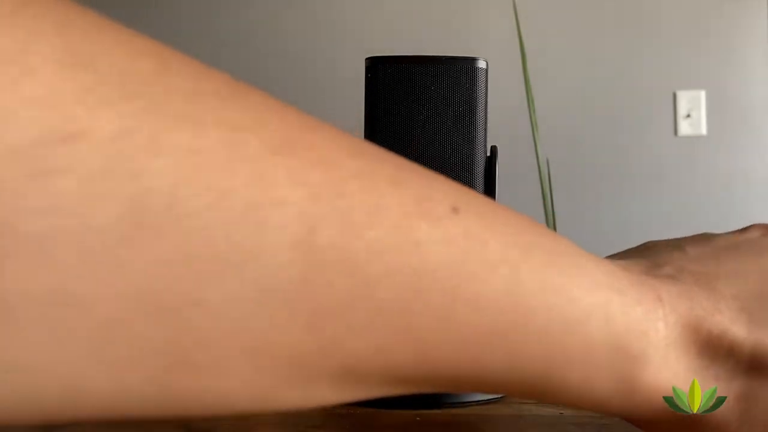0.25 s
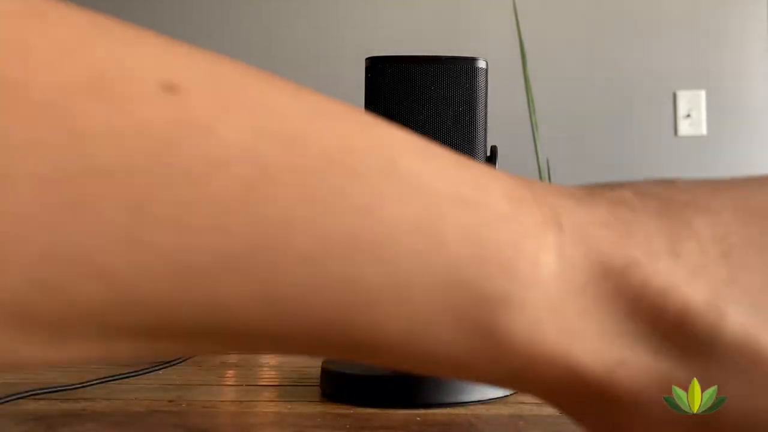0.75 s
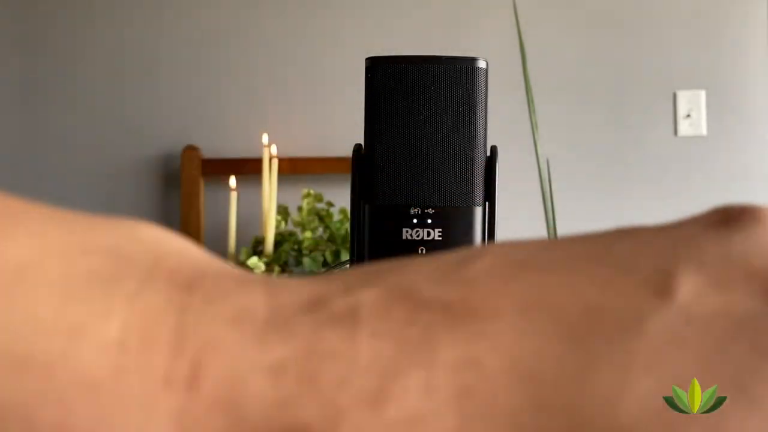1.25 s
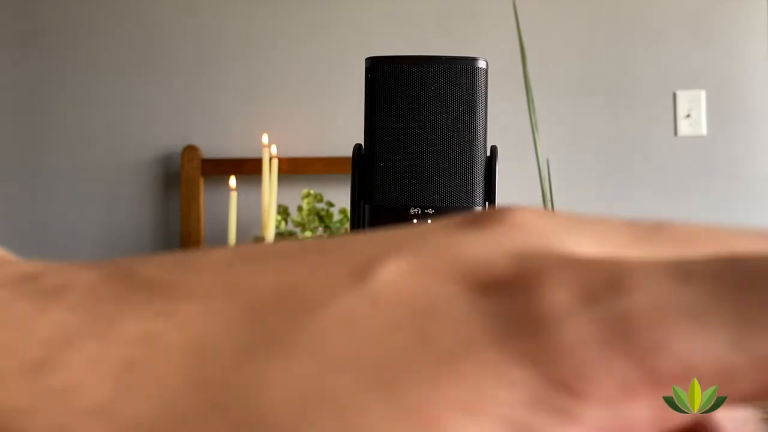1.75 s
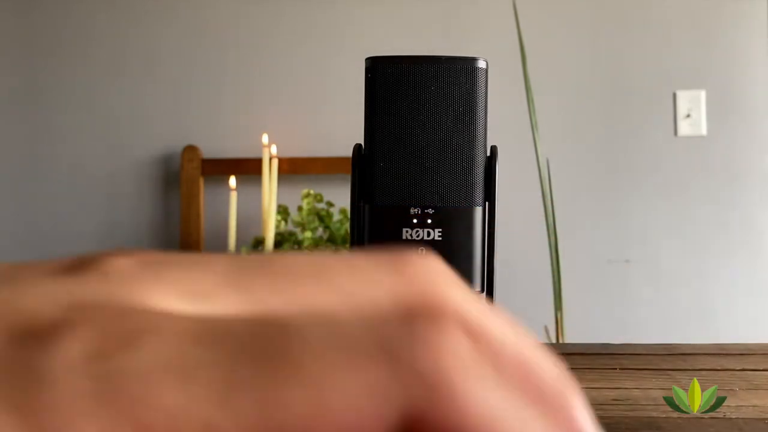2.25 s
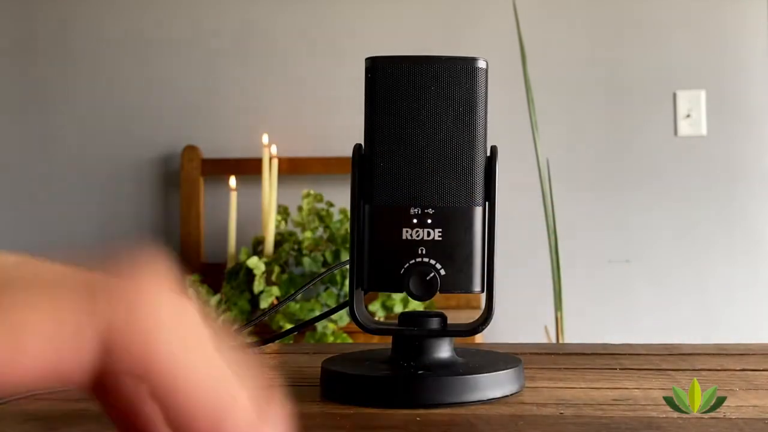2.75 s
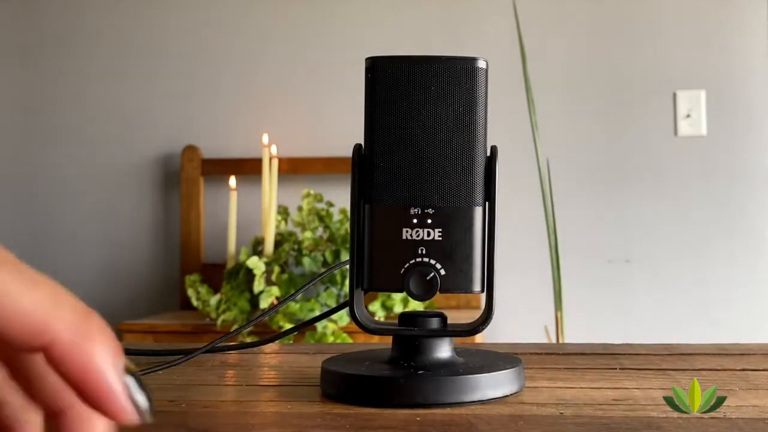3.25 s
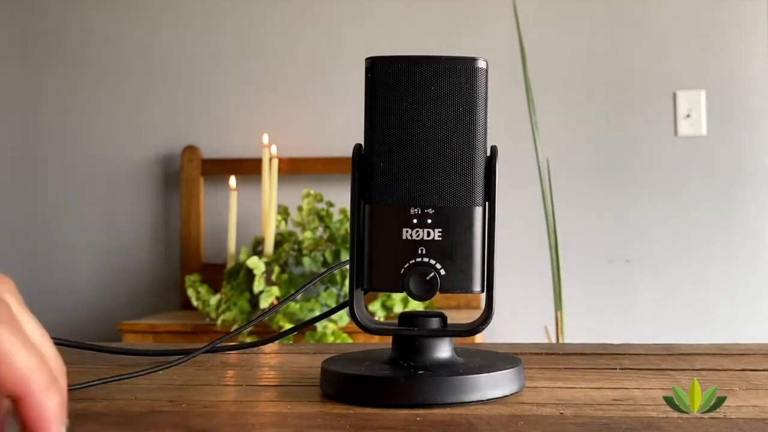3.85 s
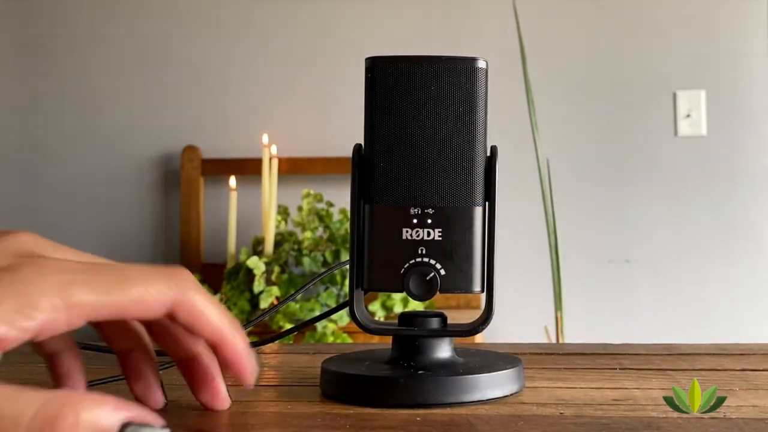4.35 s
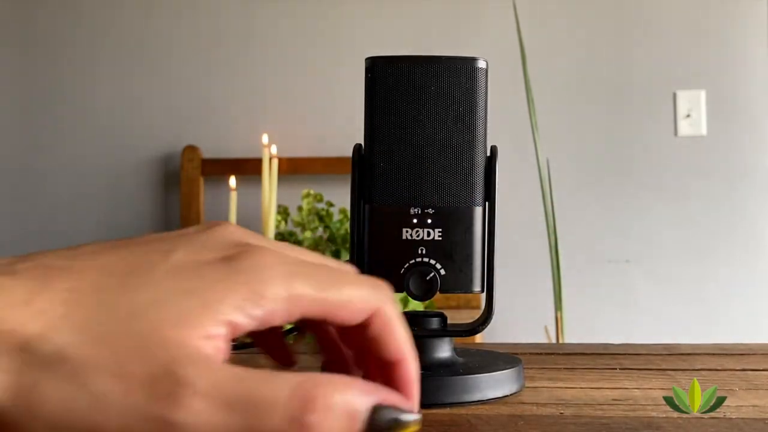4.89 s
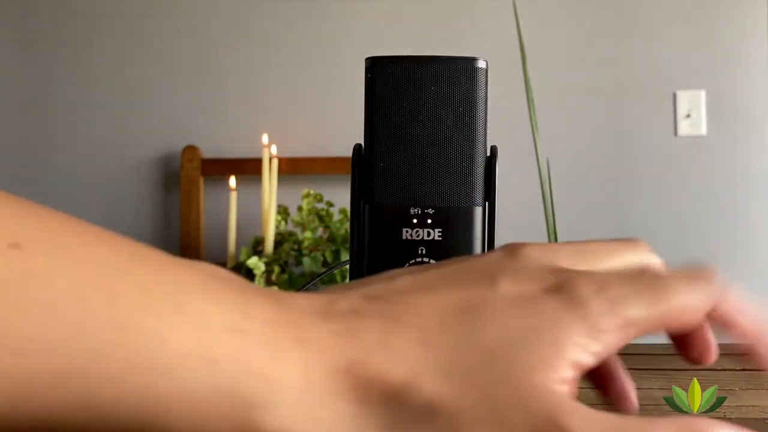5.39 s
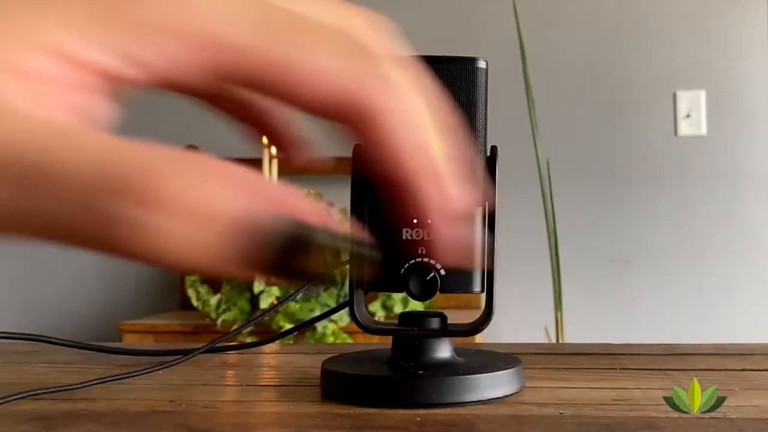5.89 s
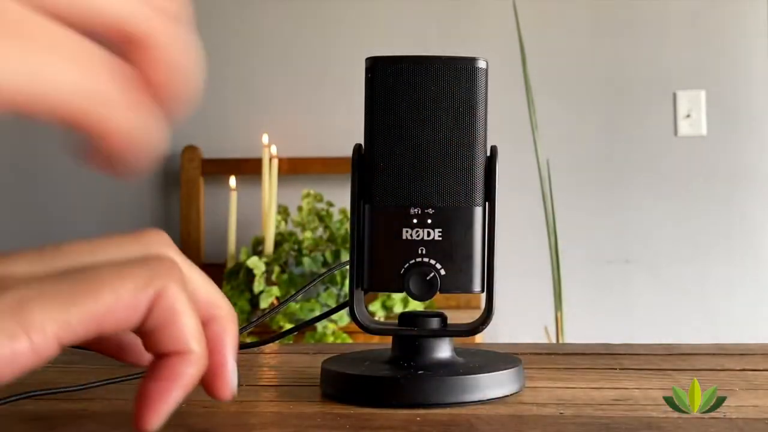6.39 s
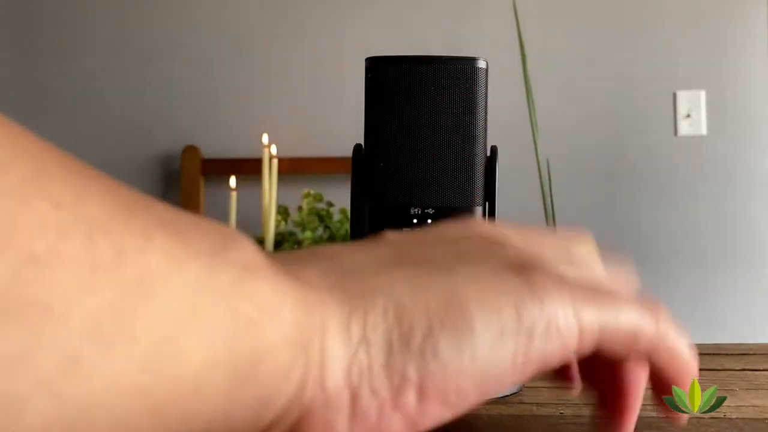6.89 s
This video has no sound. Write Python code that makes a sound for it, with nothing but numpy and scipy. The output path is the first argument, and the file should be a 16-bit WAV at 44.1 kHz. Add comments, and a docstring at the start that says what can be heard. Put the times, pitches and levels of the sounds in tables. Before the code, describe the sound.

Fingers patter continuously on a wooden board, about a dozen or more contacts each second, often doubled like tiny flams. Rounded low knocks dominate at first; brighter nail ticks join later. The wood rings briefly and low sway reaches the close mono microphone through its stand. After a stronger thump the taps stop for under a second, with faint brushing, then restart in a quick burst. Small room, very quiet air.

```python
"""Quick taps throughout: fingertips and nails walk over a wooden tabletop, with one pause.
Each contact is a short shaped pulse, a knock with a nail click, and sets off noise tails and ringing notes.
The board rings, its slow sway comes up the stand of a close microphone, and a small room answers.
Filtered noise makes the quiet air, the brief finger slides and the soft rustles in the pause.
Now and then the weight of the hand rocks the whole table."""
import sys
import numpy as np
from scipy import signal
from scipy.fft import rfft, irfft, next_fast_len
from scipy.io import wavfile
from scipy.ndimage import map_coordinates

SR = 44100
rng = np.random.default_rng(int(sys.argv[2]) if len(sys.argv) > 2 else 0)


def digitize_waveform(pressure):
    """Quantize a signal to 16-bit integers and store it at the path in sys.argv[1].

    Rows of a 2-D input are taken as channels; values are limited to [-1, 1].
    """
    field = np.atleast_2d(pressure).T
    bounded = np.clip(field, -1, 1)
    quanta = np.round(bounded * 32767).astype(np.int16)
    wavfile.write(sys.argv[1], SR, quanta)


N = 314433  # length of the scene in samples
SIZE = 4096  # length of the pulse calculations in samples


def amp(db):
    """Turn decibels into a gain."""
    return 10 ** (np.asarray(db) / 20)


def unit(x):
    """Scale a sound to an rms of 1."""
    return x / np.sqrt(np.mean(x ** 2) + 1e-20)


def along(points, hz):
    """Read a curve of (frequency, value) points, joined by straight lines on a log frequency axis."""
    point_hz, values = np.transpose(points)
    return np.interp(np.log(hz + 1), np.log(point_hz + 1), values)


def add(track, s, sound):
    """Mix a sound into the track at s seconds, cutting what falls outside."""
    start = round(s * SR)
    part = sound[max(-start, 0):max(N - start, 0)]
    track[max(start, 0):][:len(part)] += part


def noise(spectrum, n):
    """Colour white noise with a spectrum in dB, then scale it to an rms of 1."""
    m = next_fast_len(n)
    hz = np.fft.rfftfreq(m, 1 / SR)
    coloured = rfft(rng.standard_normal(m)) * amp(along(spectrum, hz))
    return unit(irfft(coloured, m)[:n])


def causal(db):
    """Make the most compact pulse that has this spectrum: its energy comes as early as possible."""
    cepstrum = irfft(np.log(amp(db)))
    cepstrum[1:SIZE // 2] *= 2
    cepstrum[SIZE // 2 + 1:] = 0
    return irfft(np.exp(rfft(cepstrum)))


def tails(levels, decays, count, size):
    """Make a fresh noise tail per tap, where each frequency has its own energy and decay."""
    white = rng.standard_normal((count, size), dtype=np.float32)
    hz, t, z = signal.stft(white, SR, nperseg=128)
    t60 = along(decays, hz)[:, None]
    fade = amp(along(levels, hz)[:, None] - 60 * t / t60)
    gain = fade * np.sqrt(2 * np.log(1000) / (t60 * SR))  # a long decay gets no extra energy
    return signal.istft(z * gain.astype(np.float32), SR, nperseg=128)[1][:, :size]


def ring(modes, vary, attack):
    """Ring fading notes for half a second; vary (0-1) sets how much chance alters their strength and sign."""
    t = np.arange(SR // 2) / SR
    hz, db, t60 = np.transpose(modes)[:, :, None]
    vary = np.clip(vary, 0, 1)
    chance = rng.uniform(-1.18, 1, hz.shape) * np.sqrt(3)
    gain = amp(db) * (np.sqrt(1 - vary ** 2) + vary * chance)
    tones = np.sin((2 * np.pi * hz * t).astype(np.float32))
    decay = np.exp((-np.log(1000) * t / t60).astype(np.float32))
    return (gain * tones * decay).sum(0) * (1 - np.exp(-t / attack))


# How well the spot under the wandering hand drives the table: time_s, board_note_db, sway_db
HAND_SPOT = [(0, -5, -2), (.15, 4, -10), (.65, 9, 1), (1.1, 6.5, -10.5), (1.6, 5, 2), (2.1, -9.5, 1.5),
             (2.6, -12, 1), (2.851, -2, 1), (3.0, 1.5, 2.5), (3.4, 5, 0), (3.87, 8.5, 1), (3.931, -3, 0),
             (4.5, 1, -3), (4.799, -1.5, -1), (5.15, -2, -8), (5.35, 4, -9), (6.2, 1, 0), (6.7, 3, -4.5),
             (7.1, 2.5, -2)]


def spot(s):
    """Read the table's response where the hand is at s seconds, gliding between the listed spots."""
    times, *columns = np.transpose(HAND_SPOT)
    return [np.interp(s, times, column) for column in columns]


NAIL_DB = -27.5  # nail level of an ordinary tap
# The click near 4.7 kHz at zero force with ordinary nail, and its rise in dB per dB
CLICK_DB, CLICK_PER_FORCE, CLICK_PER_NAIL = -20.5, 0.53, 0.33
PING_DB, PING_PER_NAIL = -31.5, 1.53  # ping near 9 kHz for an ordinary nail, and its rise in dB per dB
TICK_DB, TICK_PER_NAIL = -32.5, 1.055  # the same for the tick above 10 kHz
GRAZE_DB = 7  # the ping rises at most this far over the force: a mere graze hardly rings
KNOCK_HZ, HARDNESS_DB_PER_OCTAVE = 1110, 21  # pitch when knock equals thud; dB of extra knock per octave
KNOCK_LOW_HZ, KNOCK_HIGH_HZ = 730, 1600  # limits for the softest and hardest contact


def touch(thud, knock, snap, nail):
    """A harder contact knocks higher; force and nail set the click, nail the tick and ping (force caps the ping)."""
    force = (thud + knock) / 2
    edge = nail - NAIL_DB
    octaves = (knock - thud) / HARDNESS_DB_PER_OCTAVE
    knock_hz = np.clip(KNOCK_HZ * 2 ** octaves, KNOCK_LOW_HZ, KNOCK_HIGH_HZ)
    click = CLICK_DB + CLICK_PER_FORCE * force + CLICK_PER_NAIL * edge
    ping = min(PING_DB + PING_PER_NAIL * edge, force + GRAZE_DB)
    tick = TICK_DB + TICK_PER_NAIL * edge
    return knock, knock_hz, snap, click, ping, tick


def contact(thud, knock, knock_hz, snap, click, ping, tick, ripple_db=2, knock_peak_db=3, notch_db=4,
            ping_hz=8850, chatter=0.000335, nail_share=0.33):
    """One blow: the finger pad gives the thud, the nail a click and a narrow ping near 9 kHz."""
    hz = np.fft.rfftfreq(SIZE, 1 / SR)

    def bump(centre, width):
        """A smooth peak of height 1; width is a fraction of its centre."""
        return 1 / (1 + ((hz - centre) / (width * centre)) ** 2)

    flesh = thud - nail_share * max(ping + 30, 0)  # the more nail, the less bass
    db = along([(25, flesh - 22), (90, flesh - 9), (190, flesh + 0.5),
                (400, thud + 0.048), (580, thud - 3), (1000, knock), (1600, knock - 1.5),
                (2050, snap - 3), (2450, snap + 1), (2950, snap - 4.5),
                (3500, click - 1.5), (4700, click + 1), (7500, click - 4),
                (10500, tick + 1), (12500, tick - 2.5), (16000, tick - 12)], hz)
    db = db + knock_peak_db * bump(knock_hz, .2) - notch_db * bump(790, .03)
    db = db + (ping + 2 - db) * bump(ping_hz, 0.09) ** 2
    # each spot on the board has its own peaks and dips, deeper among the high modes
    ripple = map_coordinates(rng.standard_normal(64), [np.log(1 + hz / 400) * 11], mode="nearest")
    ripple = ripple * along([(1000, 1), (3500, 1.4)], hz)
    # the nail chatters for a moment, which spreads the treble in time (lags in seconds)
    spread = map_coordinates(rng.standard_normal(32), [hz / 1100], mode="nearest") ** 2
    lag = chatter * spread * hz ** 2 / (hz ** 2 + 2500 ** 2)
    lag = lag + .0004 / np.sqrt(1 + hz / 500)  # bending waves: low notes travel slower
    delay_turn = np.exp(-2j * np.pi * np.cumsum(lag) * SR / SIZE)
    pulse = irfft(rfft(causal(db + ripple_db * ripple)) * delay_turn)
    return -pulse[:SIZE // 2] * np.hanning(SIZE)[SIZE // 2:]


# Finger contacts: start_s, thud_db, knock_db, snap_db, nail_db
FINGER_TAPS = [(-0.012, 5, 5, -21, -38), (0.141, -27, -29, -33, -7), (0.1483, -3.5, -8, -25, -26),
               (0.1525, -5, -0.5, -16.5, -22), (0.2265, -2, -11, -21, -27), (0.2674, 4, -0.5, -14.5, -24.5),
               (0.4433, 1, -7.5, -22.5, -28), (0.448, 0, -9.5, -27, -27.5), (0.5989, 6, -2, -15, -32),
               (0.7231, -5.5, -10.5, -20, -25.5), (0.731, -2.5, -9, -17, -26.5), (0.821, 2, -14, -21, -28),
               (0.8391, 3, -9, -19, -25.5), (0.9855, -5.5, -16.5, -15, -28.5), (1.022, 1, -15, -21, -31.5),
               (1.0728, 4.5, -12, -21, -31.5), (1.106, 6, -11.5, -26, -59), (1.2753, -5, -19, -19.5, -33),
               (1.2995, 3, -16, -20, -39), (1.3449, 5, -15, -16, -27.5), (1.386, 3, -13, -22, -36),
               (1.5432, -5.5, -17, -11.5, -30), (1.561, 1.5, -17.5, -12, -25),
               (1.6386, -1, -23, -17, -31.5), (1.6835, 7, -7.5, -9, -19.5),
               (1.8268, -3.5, -10.5, -14.5, -29), (1.837, -5, -14, -14.5, -40),
               (1.8886, -2, -27, -18.5, -36), (1.9257, 2.5, -10.5, -9.5, -49),
               (2.0972, -6.5, -9.5, -14.5, -22.5), (2.225, 7, -11, -10, -23), (2.2536, 10, 2.5, 0.5, -18),
               (2.3888, -9, -11, -17.5, -24), (2.434, -13, -23, -25, -39), (2.5354, 1.5, -11, -18.5, -24),
               (2.574, 7.5, 1, -8, -16), (2.7131, -4, -8, -18, -22.5), (2.7262, 0.5, -5, -14, -23),
               (2.8133, 0.5, -10, -19, -29.5), (2.8597, 6.5, -0.5, -11, -17),
               (2.9945, -7.5, -13, -10.5, -19.5), (3.0009, 1, -2.5, -14, -21.5),
               (3.0739, -4.5, -15.5, -24, -33.5), (3.1274, 3.5, 1.5, -12.5, -22.5),
               (3.2525, -4, -9.5, -12.5, -18), (3.2663, -0.5, -5, -14, -18.5), (3.3841, -1, -9.5, -17, -26),
               (3.411, 5, 3, -13, -19.5), (3.5229, -5.5, -14, -20, -24), (3.5348, -5, -14, -15.5, -22.5),
               (3.6175, -5, -15, -17, -22.5), (3.653, 2, -4.5, -14, -22), (3.779, -14, -13.5, -16, -23),
               (3.7951, -2, -8.5, -16, -21.5), (3.8706, -5.5, -14, -20.5, -35),
               (3.9345, -3.5, -5, -17.5, -18.5), (4.0462, -7.5, -11, -19, -23.5),
               (4.182, -3, -2.5, -14.5, -12.5), (4.3004, -12, -9.5, -19, -26),
               (4.3193, -1.5, -5, -14.5, -19.5), (4.38, -3, -19, -21, -32),
               (4.4157, -6, -7.5, -15.5, -12.5), (4.5446, -7.5, -9.5, -19.5, -40),
               (4.5551, -4, -3, -11.5, -17.5), (4.6287, -3.5, -14, -16, -20),
               (4.6816, 0.5, -3.5, -12.5, -12), (4.79, 11, 4, 1.5, -9.5), (4.843, 1, 3.5, -6, -7.5),
               (4.945, -9, -9.5, -23, -22.5), (5.008, -4, -10, -20, -37), (5.127, -9.5, -13.5, -27, -40),
               (5.1745, -15, -5.5, -13, -15), (5.199, -6, -6, -14.5, -18), (5.3239, 3, -2, -19, -28),
               (5.33, 5, 0, -8.5, -16.5), (6.2028, -8, -5, -2, -31.5), (6.6702, -16, -13, -18, -26),
               (6.696, 10.5, 1.5, -3, -16), (6.713, 4, -4.5, -17, -18), (6.7863, -9, -12, -18, -32),
               (6.8097, 0, -1.5, -12, -11), (6.8389, -3, -4, -12, -36), (6.925, 5.5, -3.5, -11, -21.5),
               (6.945, -5, -21, -26, -33), (6.9789, -10, -11, -13.5, -29.5), (7.0107, -5, -6.5, -11.5, -28),
               (7.0418, -0.5, -8, -18, -20), (7.051, -0.5, -6.5, -12, -17)]
# Dense short notes of the board: pitch_hz, level_db (relative to the contact)
PLATE_LEVELS = [(100, 1), (300, -44), (700, -6), (1500, -3), (3000, -7), (8000, -4), (16000, -16)]
# How long they take to fall 60 dB: pitch_hz, decay_s
PLATE_DECAYS = [(150, 0.02), (600, 0.06), (1500, 0.032), (4000, 0.015), (12000, 0.0096)]
# The small room's answer: pitch_hz, level_db (relative to the contact)
ROOM_LEVELS = [(60, -4.5), (150, 1), (400, -10.5), (900, -9), (1800, -9.5), (3500, -13.5), (7000, -11.5),
               (9000, -11.5), (11000, -8.5), (16000, -38)]
# How long the room takes to fall 60 dB: pitch_hz, decay_s
ROOM_DECAYS = [(100, 0.6), (400, 1), (1100, 0.54), (3000, 0.4), (6000, 0.41), (9000, 0.15), (15000, 0.077)]
# Echoes from nearby surfaces: delay_s, level_db (before their colour)
NEARBY_WALLS = [(.0088, -18), (0.014, -19), (0.021, -23), (0.027, -25.5)]
# Colour of what those surfaces send back: pitch_hz, level_db
ECHO_COLOUR = [(100, -4), (6000, -3), (9000, 2), (10500, -8), (16000, -16)]
# Ringing notes of the board: pitch_hz, level_db (relative), decay_s (to fall 60 dB)
BOARD_NOTES = [(119.8, -15.5, 0.5), (155, -10, 0.19), (233, -18, 0.26), (349.3, -12, 0.24),
               (412.2, -13, 0.28), (478.5, -22, 0.35), (539, -17.5, 0.47), (581, -22.5, 0.38),
               (646, -24, 0.23), (765, -22, 0.35), (861, -19.5, 0.099), (918, -17, 0.083),
               (1227, -33, 0.36)]
# The board's strongest note: pitch_hz, level_db (relative), decay_s (to fall 60 dB)
MAIN_NOTE = [(289.7, -3.5, 0.33)]
# Slow sway of the whole table (thumps use it too): pitch_hz, level_db (relative), decay_s (to fall 60 dB)
TABLE_SWAY = [(51.8, -8, 0.59), (75.7, -7.5, 0.8), (65.6, -37, 0.043), (86.6, -5.5, 0.15)]
# Drive of the long notes for a 0 dB thud, before the hand's spot; and their rise in dB per dB of thud
NOTE_DB, SWAY_DB, BASS_GROWS = -39.5, -42.5, .5
PRESS_DB, PRESS_S = 12.5, .05  # the resting finger takes this much off the main note, this fast


def taps(board_db=-42):
    """Every contact drives the board's short and long notes, then the walls and the room."""
    track = np.zeros(N)
    plates = tails(PLATE_LEVELS, PLATE_DECAYS, count=len(FINGER_TAPS), size=SR // 10)
    rooms = tails(ROOM_LEVELS, ROOM_DECAYS, count=len(FINGER_TAPS), size=SR // 2)
    bounce = causal(along(ECHO_COLOUR, np.fft.rfftfreq(SIZE, 1 / SR)))
    t = np.arange(SR // 2) / SR
    press = PRESS_DB * (1 - np.exp(-t / PRESS_S))
    for (s, thud, knock, snap, nail), plate, room in zip(FINGER_TAPS, plates, rooms):
        spot_note, spot_sway = spot(s)
        colour = touch(thud, knock, snap, nail)
        main = NOTE_DB + BASS_GROWS * thud + spot_note
        sway = SWAY_DB + BASS_GROWS * thud + spot_sway
        response = room * (1 - np.exp(-(t / 0.007) ** 2))
        response[:len(plate)] += plate * (1 - np.exp(-t[:len(plate)] / 0.00052))
        response[0] += 1  # the direct sound
        for delay, db in NEARBY_WALLS:  # the paths change as the hand moves
            add(response, abs(delay + rng.normal(0, 0.00037)), amp(db) * bounce)
        add(track, s, signal.fftconvolve(contact(thud, *colour), response))
        add(track, s, amp(thud + board_db) * ring(BOARD_NOTES, vary=0.98, attack=0.00023))
        add(track, s, amp(main - press) * ring(MAIN_NOTE, vary=0.38, attack=0.0088))
        add(track, s, amp(sway) * ring(TABLE_SWAY, vary=0.48, attack=0.02))
    return track


# Colour of the quiet room air: pitch_hz, level_db (relative)
AIR_COLOUR = [(12, -36), (20, 4), (146, 4.5), (204, 1), (277, 3.5), (319, -1.5), (459, -0.5), (1000, -11.5),
              (2820, -14.5), (3160, -14.5), (3440, -18.5), (6910, -19), (14700, -18.5), (16000, -22.5)]


def background(air_db=-68.5, hum_db=-77, hum_hz=146):
    """Quiet room air is coloured noise; a faint hum is a sine whose level wavers slowly."""
    waver = amp(2 * noise([(3, 0), (10, -36), (40, -120)], N))
    hum = unit(waver * np.sin(2 * np.pi * hum_hz * np.arange(N) / SR))
    return amp(air_db) * noise(AIR_COLOUR, N) + amp(hum_db) * hum


# Fingers dragging on the grain: start_s, length_s, rasp_db, hiss_db (before the fade)
FINGER_SLIDES = [(0.153, 0.095, -70, -64), (0.449, 0.087, -56.5, -71), (0.738, 0.071, -63.5, -75),
                 (1.55, 0.083, -64, -68), (1.832, 0.023, -58, -68.5), (2.098, .11, -59.5, -75),
                 (2.362, 0.041, -60, -73), (4.571, 0.038, -59.5, -80), (5.202, 0.027, -45.5, -58),
                 (5.226, 0.048, -48, -58), (5.864, 0.061, -68, -85), (5.897, 0.1, -70, -103),
                 (5.993, 0.2, -72, -74), (6.276, 0.22, -83, -68.5), (6.463, 0.047, -86, -68),
                 (6.926, 0.044, -54, -70)]
# Colour of the gritty rasp: pitch_hz, level_db (relative)
RASP_COLOUR = [(180, -11), (300, -6), (781, -5.5), (1070, -7.5), (1780, -2), (2480, -17.5), (3750, -16),
               (5570, -22.5), (12300, -27.5), (15500, -29)]
# Colour of the fine skin hiss: pitch_hz, level_db (relative)
HISS_COLOUR = [(3000, -2), (7000, -4), (11000, -1), (14000, 1), (16000, -4.5)]


def slides(grain_db=4, fade_db=4):
    """A dragging finger catches on the grain: an uneven rasp under a steady skin hiss, gently fading."""
    track = np.zeros(N)
    for s, length, rasp_db, hiss_db in FINGER_SLIDES:
        n = max(round(length * SR), 64)
        grit = unit(amp(grain_db * noise([(400, 21), (1500, -40), (4000, -60)], n)))
        rasp = amp(rasp_db) * grit * noise(RASP_COLOUR, n)
        hiss = amp(hiss_db) * noise(HISS_COLOUR, n)
        fade = amp(fade_db * np.linspace(.5, -.5, n))
        add(track, s, (rasp + hiss) * signal.windows.tukey(n, .7) * fade)
    return track


# The weight of the hand rocks the table: start_s, sway_db, board_note_db
HAND_THUMPS = [(4.683, -21.5, -33.5), (4.792, -23.5, -37), (6.712, -38, -42)]
HAND_T60_S = 0.57  # the resting hand's damping, on top of each note's own decay


def thumps():
    """The hand's weight sets the whole table swaying, and the resting hand damps it."""
    track = np.zeros(N)
    damping = amp(-60 * np.arange(SR // 2) / SR / HAND_T60_S)
    for s, sway_db, note_db in HAND_THUMPS:
        sway = amp(sway_db) * ring(TABLE_SWAY, vary=0.17, attack=0.029)
        note = amp(note_db) * ring(MAIN_NOTE, vary=0.18, attack=0.0019)
        add(track, s, (sway + note) * damping)
    return track


# Soft low rustles as the hand moves away: peak_s, level_db
HAND_BRUSHES = [(5.79, -68), (5.925, -61)]
# Colour of a rustle: pitch_hz, level_db (relative)
RUSTLE_COLOUR = [(200, -48.5), (380, -19), (470, 0), (560, -13), (800, -20), (2000, -55)]
BRUSH_RISE_S, BRUSH_FALL_S = 0.012, 0.033  # time constants of the swell and fade


def brush():
    """Soft, hollow rustles in the pause are narrow low noise with a quick swell and a slower fade."""
    t = np.arange(N) / SR
    level = np.zeros(N)
    for s, db in HAND_BRUSHES:
        level += amp(db) * np.exp(np.minimum((t - s) / BRUSH_RISE_S, (s - t) / BRUSH_FALL_S))
    return level * noise(RUSTLE_COLOUR, N)


def scene():
    """Mix taps, room air, slides, thumps and rustles into one channel."""
    return (taps() + background() + slides() + thumps() + brush())[None]


TOP_HZ = 16200  # the recorder's band limit


def record(dry):
    """The recorder keeps nothing at or above its band limit."""
    m = next_fast_len(N + SR // 2)
    kept = np.fft.rfftfreq(m, 1 / SR) < TOP_HZ
    return irfft(rfft(dry, m) * kept, m)[:, :N]


dry = scene()
out = record(dry)
digitize_waveform(out)
```